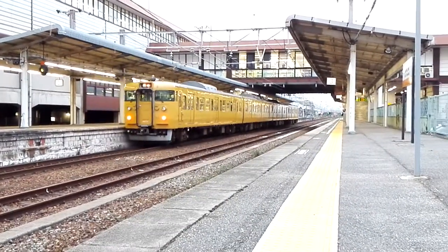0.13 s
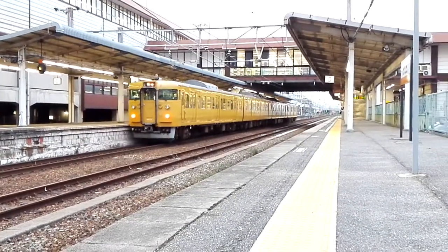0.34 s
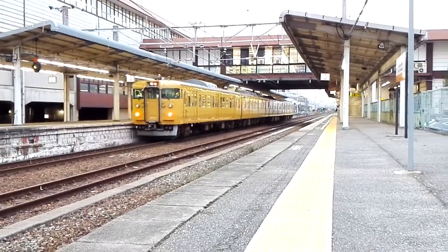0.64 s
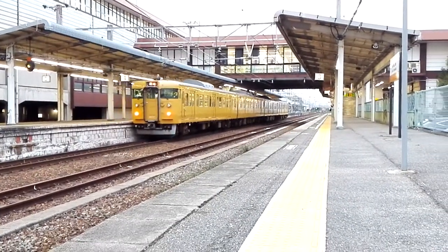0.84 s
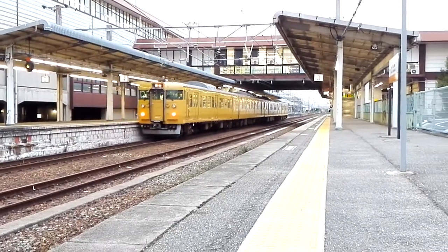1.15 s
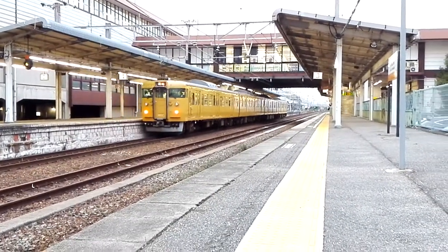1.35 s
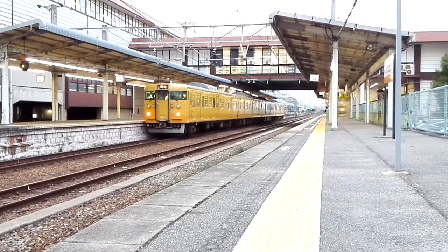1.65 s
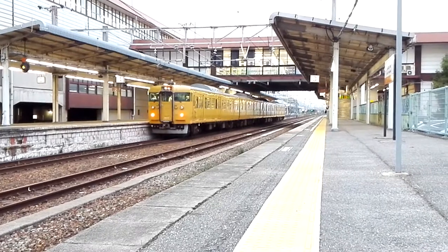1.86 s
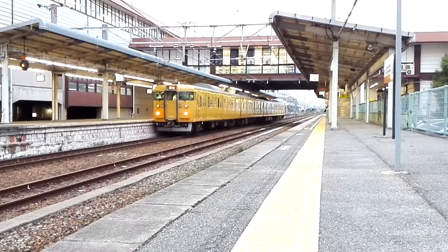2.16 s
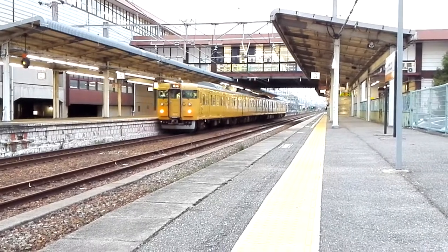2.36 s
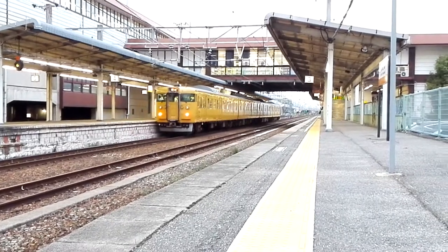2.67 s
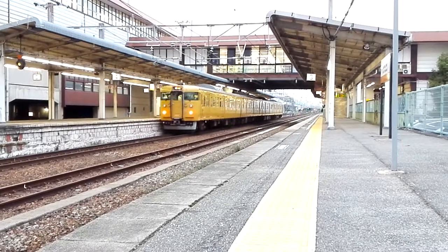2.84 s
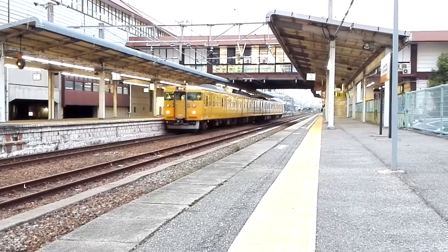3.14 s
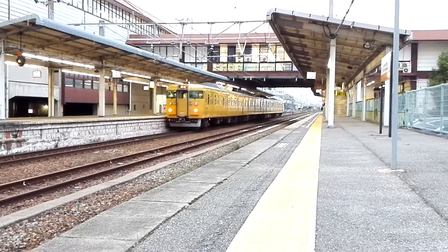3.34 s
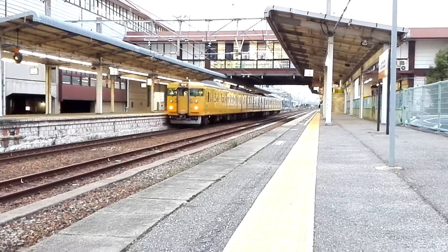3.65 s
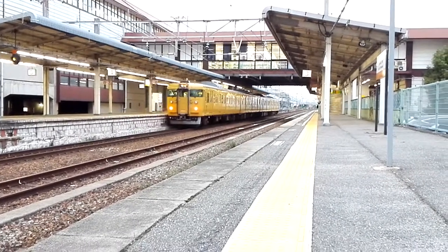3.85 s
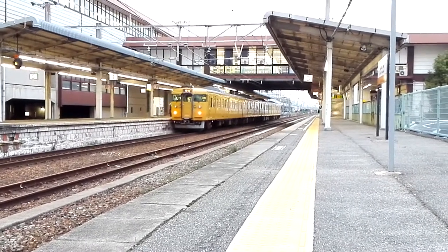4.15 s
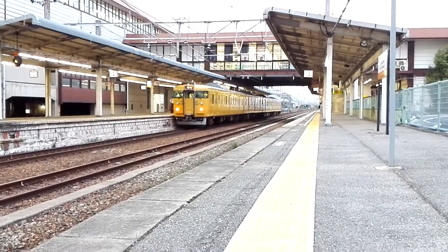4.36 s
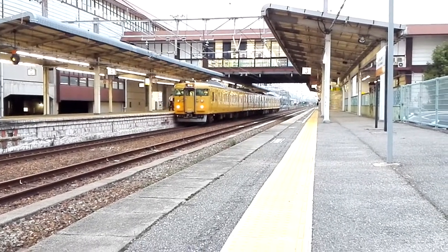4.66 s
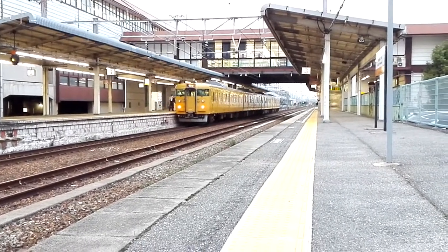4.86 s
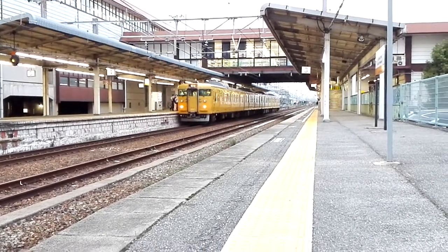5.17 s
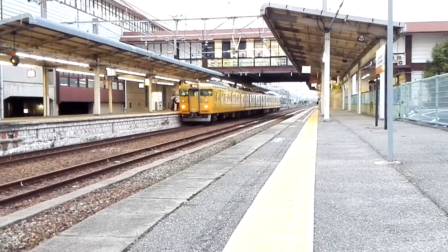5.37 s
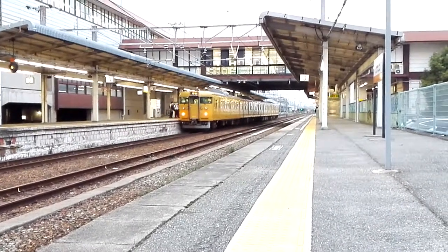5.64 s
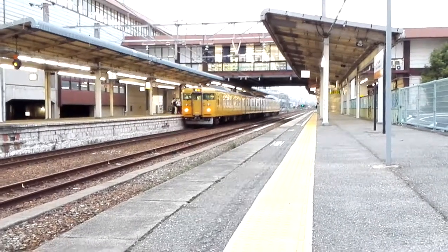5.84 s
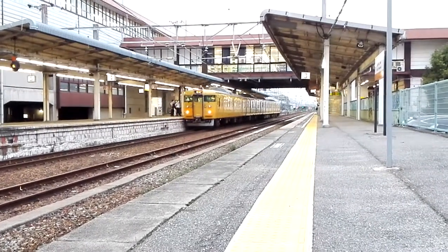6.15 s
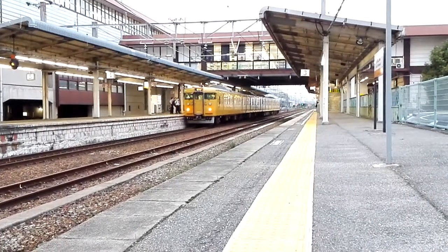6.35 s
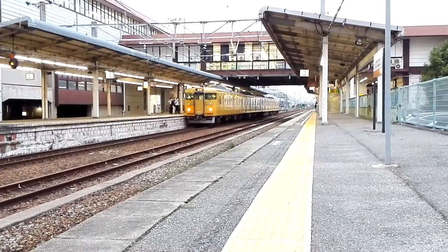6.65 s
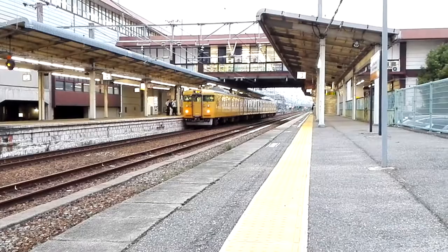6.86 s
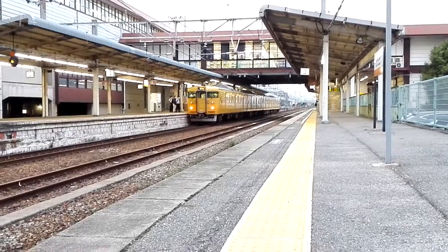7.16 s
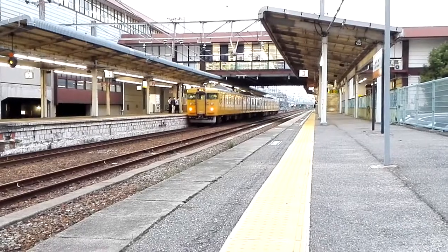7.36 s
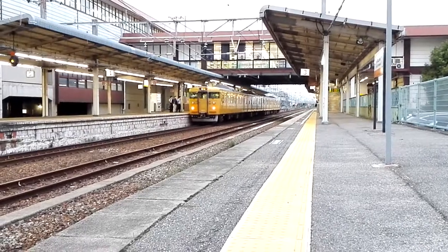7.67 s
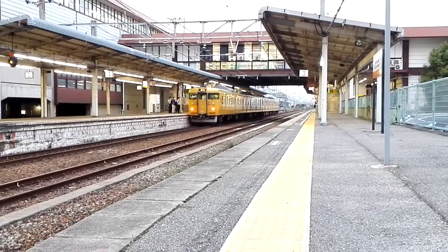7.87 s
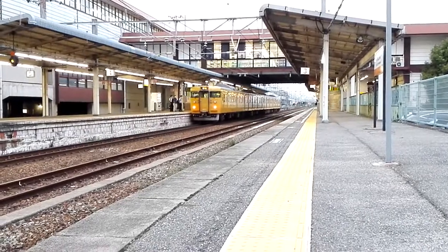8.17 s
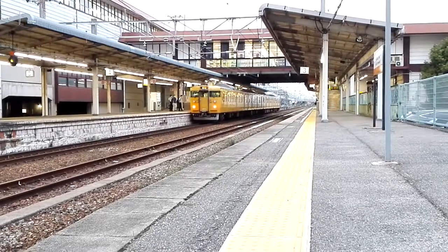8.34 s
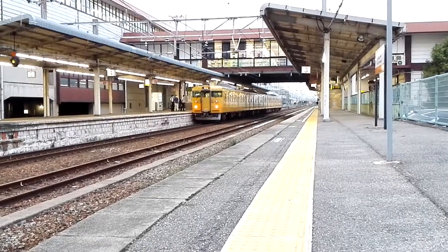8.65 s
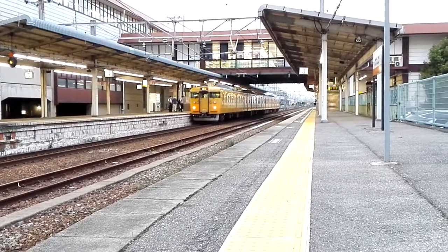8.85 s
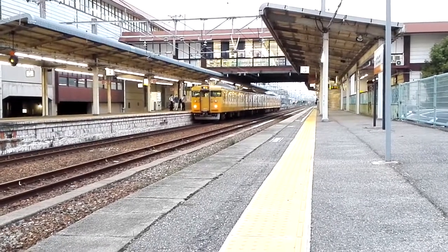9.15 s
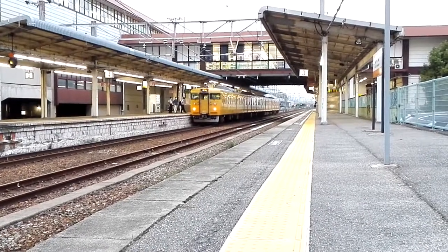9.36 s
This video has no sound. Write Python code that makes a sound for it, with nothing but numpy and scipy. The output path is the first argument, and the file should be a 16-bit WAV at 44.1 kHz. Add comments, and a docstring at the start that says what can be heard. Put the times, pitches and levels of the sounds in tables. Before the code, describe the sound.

Piercing, fluttering brake squeals chirp in pairs, slowing with the wheels, above a steady dull train rumble; one sharp dry tick sounds close by.

```python
"""Squealing electric train

An electric train brakes slowly beside an open platform, heard from across the tracks.
Stick-slip friction at the brake blocks makes several wheel modes squeal, wavering and often throbbing.
Filtered noise gives rolling rumble, machinery roar, gusts of air hiss and a fizz at the top; narrow
noise bands give hum. Dry ticks close to the microphone are damped modes struck by short blows."""
import sys
import numpy as np
from scipy import signal
from scipy.io import wavfile
from scipy.ndimage import uniform_filter1d

SR = 44100
rng = np.random.default_rng(int(sys.argv[2]) if len(sys.argv) > 2 else 0)


def generate_wav(sig):
    """Save sig (samples, or channels by samples) to the path in sys.argv[1] as 16-bit PCM at SR."""
    pcm = np.round(np.clip(np.atleast_2d(sig).T, -1, 1) * 32767).astype(np.int16)
    wavfile.write(sys.argv[1], SR, pcm)


N = 419391  # length in samples


def wheels():
    """Superposition: the squeals of all wheel modes add linearly."""
    out = np.zeros(N)
    for s, sound in grabs() + long_squeals() + squeaks():
        add(out, s, sound)
    return out


# One worn block grabs its wheel twice a turn. Levels are before the mix.
# Each row: level of the touch before the grab in dB, first grab in seconds, its pitch in Hz, its level in dB,
# slip in seconds, second grab in seconds, its pitch in Hz, its level in dB, release in seconds,
# pitch at release in Hz.
WHEEL_TURNS = [(-68, .236, 4640, -49, .32, .372, 4560, -40.5, .46, 4460),
               (-58, .573, 4390, -40, .685, .724, 4380, -40.5, .805, 4450),
               (-68, .912, 4380, -40, 1.01, 1.085, 4480, -41.5, 1.165, 4450),
               (-59, 1.295, 4440, -43.5, 1.395, 1.444, 4405, -44, 1.55, 4390),
               (-63, 1.656, 4600, -46, 1.74, 1.842, 4780, -49.5, 1.92, 4790),
               (-63, 2.038, 4740, -51.5, 2.15, 2.18, 4770, -55, 2.3, 4920),
               (-68, 2.433, 4730, -43, 2.51, 2.631, 4830, -47, 2.72, 4770),
               (-51, 2.875, 4610, -48, 3.03, 3.064, 4750, -49.5, 3.19, 4900),
               (-52, 3.322, 4610, -41, 3.42, 3.452, 4620, -46.5, 3.64, 4850),
               (-52, 3.798, 4530, -43, 3.98, 4.026, 4470, -43, 4.155, 4520),
               (-60, 4.274, 4420, -41, 4.415, 4.487, 4390, -42.5, 4.7, 4450),
               (-58, 4.83, 4430, -43, 5.05, 5.105, 4565, -43, 5.29, 4530),
               (-60, 5.409, 4610, -45, 5.58, 5.638, 4570, -42, 5.88, 4550),
               (-62, 6.18, 4865, -49, 6.35, 6.44, 4930, -50, 6.66, 4900),
               (-56, 6.935, 4915, -46, 7.075, 7.138, 5020, -53, 7.53, 5070),
               (-57, 7.98, 5000, -54, 8.14, 8.151, 5010, -55, 8.49, 5120)]
TURNS_PER_S, SLOWING_PER_S2 = 3.15, .28  # wheel speed at the start, and how fast it falls
TOUCH_TURN = 0.094  # the touch comes this share of a turn before the grab
TOUCH_HZ, TOUCH_UP = 4800, 1.015  # lowest touch pitch, and least ratio to the grab's pitch
FIRST_GLIDE, FIRST_FADE_DB, SECOND_FADE_DB = .99, 1.5, 6
# A light drag joins the grabs, glides to just above the release pitch and outlasts the release.
DRAG_DB, DRAG_UP, TRAIL_S = -16, 1.01, .09


def grabs():
    """Periodic excitation: each turn brings touch, grab, slip, grab, release; slower turns stretch the touch."""
    played = []
    for touch_db, s, hz, db, slip_s, next_s, next_hz, next_db, end_s, end_hz in WHEEL_TURNS:
        turn_s = 1 / (TURNS_PER_S - SLOWING_PER_S2 * s)
        touch_hz = max(TOUCH_HZ, TOUCH_UP * hz)
        drag_db = max(db, next_db) + DRAG_DB
        played += grab(s - TOUCH_TURN * turn_s, s, touch_hz, .993 * touch_hz, touch_db, 2.3)
        played += grab(s, slip_s, hz, FIRST_GLIDE * hz, db, FIRST_FADE_DB)
        played += grab(next_s, end_s, next_hz, end_hz, next_db, SECOND_FADE_DB)
        played += grab(s, end_s + TRAIL_S, hz, DRAG_UP * end_hz, drag_db, 5.5)
    return played


def grab(s, end, first_hz, last_hz, db, fade_db):
    """Mode coupling: a grab slides down into its mode, rings out upwards and shakes the upper neighbour mode."""
    end = max(end, s + .04)
    hard = np.clip((5150 - first_hz) / 700, .45, 1)  # hard grabs sit lower and are rougher
    rows = np.array([(s - .015, 1.012 * first_hz, db - 18),
                     (s + 0.012, first_hz, db),
                     (end - .01, last_hz, db - fade_db),
                     (end + 0.042, 1.005 * last_hz, db - fade_db - 23)])
    neighbour = rows * [1, 1.038, 1] - [0, 0, 26 - 15 * hard]
    return [squeal(rows, width_hz=80 * hard, steady=0.21, wobble_hz=28 * hard, octave_db=-20.5),
            squeal(neighbour, width_hz=110, steady=0.11, wobble_hz=30.0, octave_db=-18)]


# Long squeals of five wheel modes, one inner table a spell. Levels are before any throb and the mix.
# Each row: time in seconds, pitch in Hz, level in dB.
STEADY_MODE = [
    [(0, 3390, -54.5), (.7, 3415, -49), (1.2, 3465, -57.5), (1.9, 3520, -66), (2.07, 3508, -53),
     (3, 3505, -53.5), (4.02, 3493, -57), (4.2, 3530, -73)],
    [(6.06, 3500, -77), (6.17, 3475, -57.5), (6.6, 3460, -54), (6.85, 3560, -49.5), (8.2, 3536, -50),
     (8.6, 3650, -51.5), (9.29, 3660, -51.5), (9.33, 3640, -65), (9.51, 3629, -60)],
]
LOW_MODE = [
    [(0, 2330, -70), (.55, 2264, -56.5), (.9, 2300, -64), (1.8, 2338, -70), (2.6, 2338, -64.5),
     (3.3, 2336, -72)],
    [(4.05, 2336, -67), (4.6, 2256, -57), (5.05, 2260, -60), (5.25, 2256, -81), (5.55, 2260, -68),
     (6.1, 2335, -60), (6.5, 2345, -65), (6.9, 2345, -84), (7.7, 2348, -68), (9, 2350, -76)],
]
SHARP_MODE = [
    [(2.18, 5900, -72), (2.36, 5770, -64), (2.55, 5700, -73)],
    [(6.05, 5673, -80), (6.14, 5670, -70), (6.76, 5620, -70), (6.8, 5670, -56), (7, 5712, -50),
     (8.1, 5700, -52), (8.45, 5730, -65), (8.53, 5725, -54), (8.75, 5740, -50.5), (8.86, 5720, -60),
     (8.92, 5750, -50), (9.1, 5720, -46), (9.25, 5730, -62), (9.4, 5740, -48), (9.51, 5760, -50)],
]
THIN_MODE = [
    [(2.5, 6200, -72), (2.68, 6150, -62), (3.2, 6120, -70), (3.5, 6220, -54), (3.64, 6380, -71),
     (3.7, 6150, -61), (3.9, 6100, -68)],
    [(6.1, 6200, -77), (6.7, 6120, -62), (7, 6200, -77), (7.25, 6150, -66), (7.6, 6200, -79),
     (7.85, 6240, -67), (8.35, 6200, -67), (8.46, 6280, -78), (8.65, 6300, -68), (9, 6300, -94)],
]
HIGH_MODE = [
    [(6.1, 6860, -69), (6.77, 6820, -58.5), (6.95, 6840, -80)],
    [(7.6, 6840, -77), (7.78, 6800, -57), (7.92, 6840, -70)],
    [(8.42, 6820, -70), (8.5, 6840, -53), (8.8, 6840, -55), (9.15, 6960, -61), (9.37, 6890, -51),
     (9.5, 6860, -73)],
]


def long_squeals():
    """Modal vibration: each wheel mode has its own flutter and octave, and all but the low one throb."""
    played = []
    for rows in STEADY_MODE:
        rows = throbbing(rows, depth_db=0.2, swell_s=0.03)
        played += [squeal(rows, width_hz=101, steady=0.47, wobble_hz=12.3, octave_db=-5.5)]
    for rows in LOW_MODE:
        played += [squeal(rows, width_hz=55, steady=0.36, wobble_hz=19.3, octave_db=-25)]
    for rows in SHARP_MODE:
        rows = throbbing(rows, depth_db=2.0, swell_s=0.01)
        played += [squeal(rows, width_hz=43, steady=0.76, wobble_hz=7.7, octave_db=-23.5)]
    for rows in THIN_MODE:
        rows = throbbing(rows, depth_db=3, swell_s=0.038)
        played += [squeal(rows, width_hz=120, steady=0.4, wobble_hz=22, octave_db=-28)]
    for rows in HIGH_MODE:
        rows = throbbing(rows, depth_db=5, swell_s=.022)
        played += [squeal(rows, width_hz=51, steady=0.59, wobble_hz=16.0, octave_db=-30)]
    return played


# Short squeaks of the wheels. Levels are before the mix.
# Each row: start in seconds, starting level in dB, starting pitch in Hz, length in seconds.
SHORT_SQUEAKS = [(0.06, -54, 4770, 0.049), (2.3, -74, 3950, .2), (5.89, -65, 4530, 0.42),
                 (5.977, -53, 4860, 0.044), (6.021, -54, 6700, .07), (6.293, -64, 9230, .05),
                 (6.937, -70, 9000, .04), (7.08, -58, 6870, .05), (7.192, -65, 9000, 0.033),
                 (7.207, -47, 6730, 0.069), (7.373, -50, 9700, 0.036), (7.42, -64, 9000, .07),
                 (7.738, -56.5, 8780, .057), (7.822, -65, 8880, .11), (7.947, -47, 6740, .07),
                 (7.968, -65, 9080, .048), (8.09, -54, 6790, 0.086), (8.273, -58.5, 8880, .1),
                 (8.3, -64, 9550, 0.055), (8.32, -42.5, 6700, 0.066), (8.48, -67, 4640, 0.39),
                 (8.547, -68, 8670, 0.41), (8.69, -64, 9000, 0.23), (8.965, -57.5, 8900, .33),
                 (8.995, -66, 4420, 0.21), (9.009, -68, 8570, 0.24), (9.097, -60, 5230, .08),
                 (9.218, -60, 9580, .2), (9.27, -59, 4950, 0.26), (9.3, -62, 5140, .2),
                 (9.28, -62, 6500, 0.26), (9.33, -63, 4450, 0.18)]


def squeaks():
    """Brief stick-slip: each squeak rises slightly in pitch as its level falls."""
    played = []
    for s, db, hz, length in SHORT_SQUEAKS:
        rows = [(s, hz, db), (s + length, 1.004 * hz, db - 7)]
        played += [squeal(rows, width_hz=45, steady=0.79, wobble_hz=21, octave_db=-40)]
    return played


def throbbing(rows, depth_db, swell_s):
    """Amplitude modulation: the level, set every 10 ms, swells and dips at random as the grip changes."""
    s, hz, db = np.transpose(rows)
    t = np.arange(s[0], s[-1], .01)
    shape = np.exp(-(np.arange(-30, 31) / 100 / swell_s) ** 2)
    swell = evened(signal.convolve(rng.standard_normal(len(t)), shape, "same"))
    return np.transpose([t, np.interp(t, s, hz), np.interp(t, s, db) + depth_db * swell])


def squeal(rows, width_hz, steady, wobble_hz, octave_db):
    """Stick-slip oscillation: a mode kept ringing flutters, and its octave grows faster than the tone."""
    s, hz, db = np.transpose(rows)
    t = np.arange(s[0], s[-1], 1 / SR)
    kicks = abs(drift(41.0, size=len(t))) ** 2 - 1  # slips kick the pitch upwards
    pitch = np.interp(t, s, hz) + wobble_hz * kicks
    phasor = np.exp(2j * np.pi * (np.cumsum(pitch) / SR + rng.random()))
    steady = np.clip(steady, 0, 1)  # share of power that does not flutter
    swing = np.sqrt(steady) + np.sqrt(1 - steady) * drift(width_hz, size=len(t))  # grip comes and goes
    wave = gain_of(np.interp(t, s, db)) * swing * phasor
    # square law, levelling off when loud
    octave = gain_of(octave_db) * wave ** 2 / (abs(wave) + gain_of(-55.5))
    fade = signal.windows.tukey(len(t), min(0.015 * SR / len(t), 1))
    return s[0], np.sqrt(2) * (wave + octave).real * fade


# Modes of a small hard part. Each row: frequency in Hz, width in Hz, relative level in dB.
SNAP_MODES = [(2000, 1700, 5.5), (3150, 390, -4.5), (4060, 380, -15.5), (6800, 1100, 2), (9350, 1900, 2),
              (13300, 1400, -7)]
# Each row: start of the tick in seconds, peak level in dB.
TICK_TIMES = [(1.2543, -4.3), (5.757, -46), (6.003, -45)]


def tick():
    """Impulse response: a lead-in touch, a blow and a faint rattle ring a few damped modes of a small part."""
    t = np.arange(600) / SR
    ring = np.zeros(len(t))
    for k, (hz, width, db) in enumerate(SNAP_MODES):
        ring += (-1) ** k * gain_of(db) * np.exp(-np.pi * width * t) * np.sin(2 * np.pi * hz * t)
    rattle = rng.standard_normal(len(t)) * (rng.random(len(t)) < .2)
    blows = gain_of(-19 - 60 * t / .012) * rattle
    blows[:17], blows[17] = 0, 1  # the blow
    blows[0] = gain_of(-16)  # the touch before it
    highpass = signal.butter(2, 1100, "high", fs=SR)  # the part is too small for bass
    sound = signal.lfilter(*highpass, np.convolve(blows, ring))
    out = np.zeros(N)
    for s, db in TICK_TIMES:
        out[round(s * SR):][:len(sound)] = gain_of(db) * sound / abs(sound).max()
    return out


def canopy(x):
    """Reflection: platform wall and roof return sparse echoes, decaying 60 dB in 0.35 s."""
    taps = np.zeros(SR // 2)
    at = np.arange(300, len(taps) - 22, 22)
    at = at + rng.integers(0, 22, len(at))  # one echo at random in each 22 samples
    taps[at] = rng.choice([-1., 1.], len(at)) * gain_of(-60 * at / SR / .35)
    return signal.fftconvolve(x, taps / np.linalg.norm(taps))[:N]


# Levels of the background. Each row: time in seconds, deep rumble in dB, rumble in dB, machinery roar in dB,
# air hiss in dB, top fizz in dB.
BED_LEVELS = [(0, -47, -42.5, -48, -69, -78), (.7, -66, -41.5, -48.5, -71.5, -75.5),
              (2.2, -51, -44, -49.5, -71.5, -77), (3.45, -52, -44, -50, -71.5, -77),
              (3.92, -50, -46.5, -49.5, -67.5, -75), (4.4, -57, -45, -51, -74, -73.5),
              (5.9, -54, -45.5, -51, -76.5, -73.5), (6.7, -76, -45, -52, -73.5, -73.5),
              (7.4, -58, -44.5, -50.5, -72.5, -73), (8.25, -45.5, -46.5, -48.5, -70, -74),
              (8.98, -56, -44.5, -48.5, -71.5, -71), (9.3, -52, -45, -48, -66.5, -74),
              (9.51, -51, -45, -47.5, -63.5, -78)]
# Noise colours of these five layers. Each row: frequency in Hz, relative spectral level in dB per Hz.
DEEP_COLOUR = [(20, -22), (40, -10), (60, -2), (80, 3), (100, -4), (130, -25)]
RUMBLE_COLOUR = [(50, -37), (85, -6.5), (118, 1.5), (162, -9), (262, -7), (318, -14), (350, -10),
                 (377, -16.5), (500, -18.5), (650, -46), (1100, -120)]
ROAR_COLOUR = [(210, -27), (350, -5.5), (472, -5), (676, -3.5), (912, -9.5), (1200, -6), (1460, -14.5),
               (2300, -18.5), (2530, -21), (4100, -30.5), (5330, -46), (9020, -120)]
AIR_COLOUR = [(1400, -18), (2000, -14.5), (3000, 1), (4000, 0), (5400, -3), (6500, 2), (7400, -1.5),
              (8000, -9.5), (9800, -13), (11000, -14.5), (12000, -25), (14300, -28)]
FIZZ_COLOUR = [(9000, -22), (11200, -13), (12500, -3), (13000, -7), (13400, -4.5), (14400, 0)]


def bed():
    """Broadband noise: rolling rumble, the roar of blowers, air hiss and top fizz, with hum added."""
    s, *levels = np.transpose(BED_LEVELS)
    t = np.arange(N) / SR
    deep, rumble, roar, air, fizz = (gain_of(np.interp(t, s, db)) for db in levels)
    out = rumble * hiss(RUMBLE_COLOUR, 95, 400, patchy_db=0.84) + hum()
    out += deep * hiss(DEEP_COLOUR, 40, 95, patchy_db=1.2)
    out += roar * hiss(ROAR_COLOUR, 500, 2160, patchy_db=0.53)
    out += air * hiss(AIR_COLOUR, 7428, 8900, patchy_db=2.0)
    return out + fizz * hiss(FIZZ_COLOUR, 12600, 14100, patchy_db=2.5)


# Machinery hum. Each row: frequency in Hz, width in Hz, amplitude in dB as reached at 4 s.
HUM_BANDS = [(114.3, 9.2, -46), (264.7, 9.3, -54), (351.3, 3.4, -55), (1051, 53, -64.5)]


def hum():
    """Narrowband noise: slow complex drift modulates each carrier into a wavering tone."""
    t = np.arange(N) / SR
    out = np.zeros(N)
    for hz, width, db in HUM_BANDS:
        out += gain_of(db) * (drift(width, size=N) * np.exp(2j * np.pi * hz * t)).real
    return out * gain_of(2 - .5 * t)  # the hum sinks as the train slows


def side_hiss():
    """Decorrelation: treble hiss of opposite sign on the two sides makes them differ a little."""
    colour = [(4000, -32), (7000, -3), (10000, 3.5), (14300, 1)]  # (Hz, relative dB per Hz)
    return gain_of(-77.5) * hiss(colour, 4000, 14300, patchy_db=1.5)


def hiss(spectrum, lo_hz, hi_hz, patchy_db):
    """Spectral shaping: coloured noise with drifting patches, rms about 1 between lo_hz and hi_hz."""
    frames, hz = N // 256 + 5, np.fft.rfftfreq(1024, 1 / SR)
    a, b, patches = rng.standard_normal((3, frames, 513)).transpose(0, 2, 1)
    patches = uniform_filter1d(patches, size=10, axis=0)  # smooth over frequency
    patches = evened(uniform_filter1d(patches, size=12, axis=1))  # and over time
    f, db = np.transpose(spectrum)
    colour = gain_of(np.interp(np.log(hz + 1), np.log(f), db, -120, -120))
    in_band = (hz > lo_hz) & (hz < hi_hz)
    share = np.sqrt(np.sum(colour[in_band] ** 2) / np.sum(colour ** 2))
    z = (a + 1j * b) * colour[:, None] * gain_of(patchy_db * patches)
    return evened(signal.istft(z, nperseg=1024, noverlap=768)[1][:N]) / share


def drift(width_hz, size):
    """Lowpass filtering: complex noise around zero frequency with steep skirts, rms 1."""
    z = rng.standard_normal(size + 2000) + 1j * rng.standard_normal(size + 2000)
    lowpass = signal.butter(2, abs(width_hz) / 2, fs=SR, output="sos")
    return evened(signal.sosfilt(lowpass, z)[-size:])


def gain_of(db):
    """Logarithmic level: decibels to an amplitude factor."""
    return 10 ** (np.asarray(db) / 20)


def evened(x):
    """Normalisation: scales to rms 1."""
    return x / np.sqrt(np.mean(abs(x) ** 2) + 1e-20)


def add(mix, s, sound):
    """Superposition: mixes a sound in from s seconds."""
    part = mix[round(s * SR):][:len(sound)]
    part += sound[:len(part)]


def scene():
    """Mid and side: everything arrives from the middle; only treble hiss differs between the sides."""
    squeals = wheels()
    mid = gain_of(-0.5) * squeals + gain_of(-8) * canopy(squeals) + bed() + tick()
    side = side_hiss()
    return np.array([mid + side, mid - side])


def record(dry):
    """Band limiting: a linear-phase lowpass removes what lies above 14.3 kHz."""
    lowpass = signal.firwin(511, 14300, window=("kaiser", 9), fs=SR)
    return signal.oaconvolve(dry, lowpass[None], "same")


dry = scene()
out = record(dry)
generate_wav(out)
```